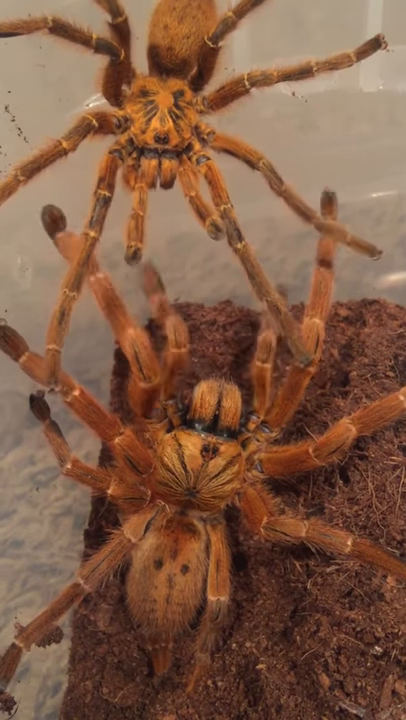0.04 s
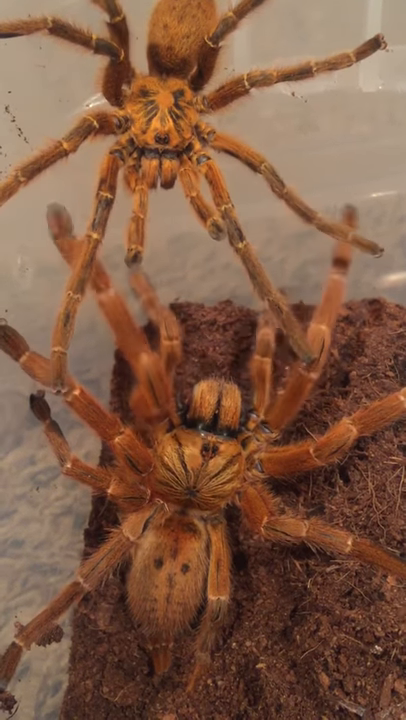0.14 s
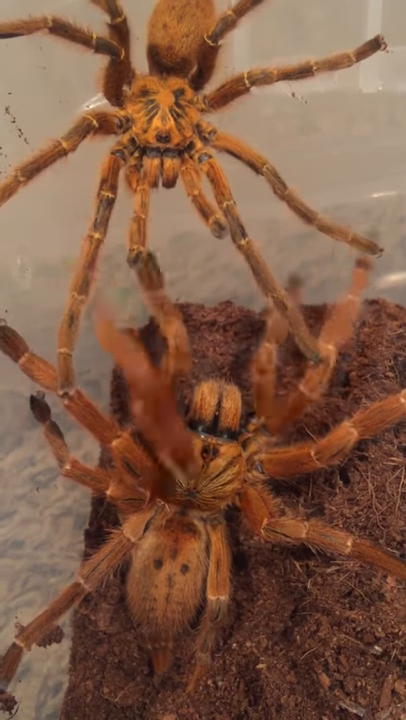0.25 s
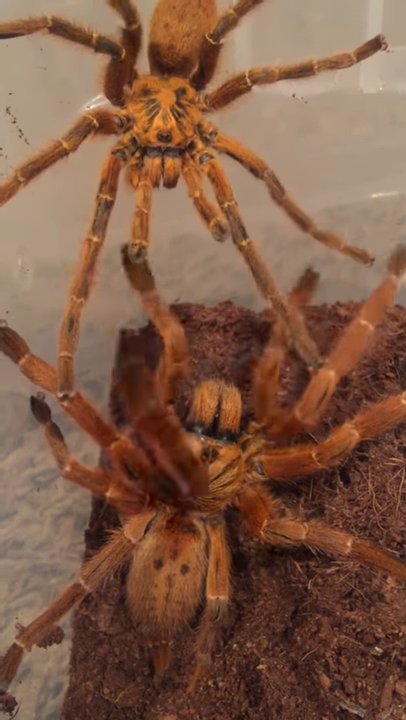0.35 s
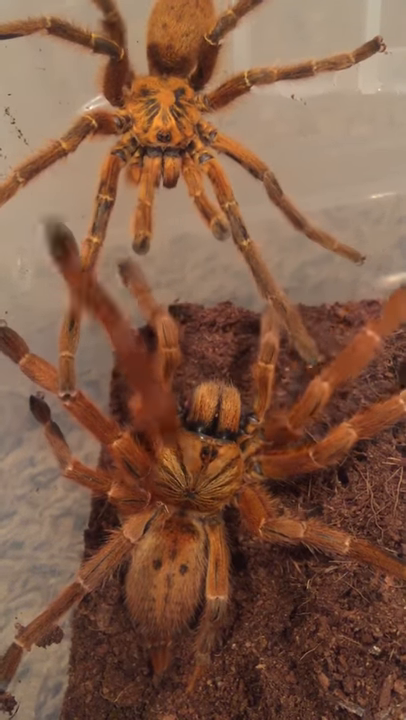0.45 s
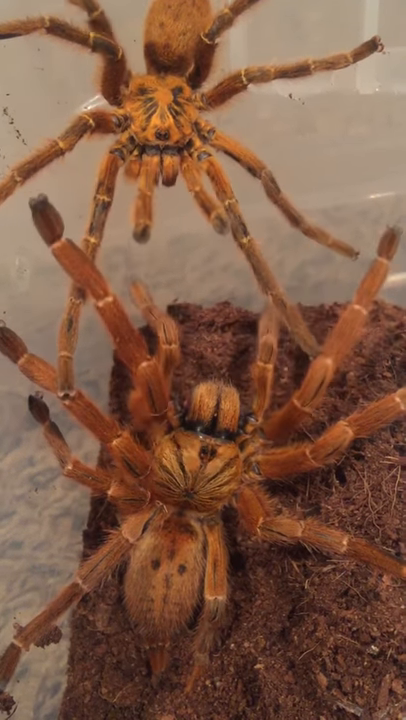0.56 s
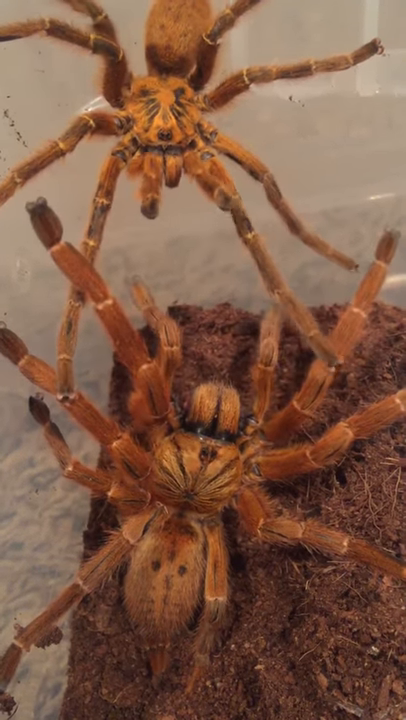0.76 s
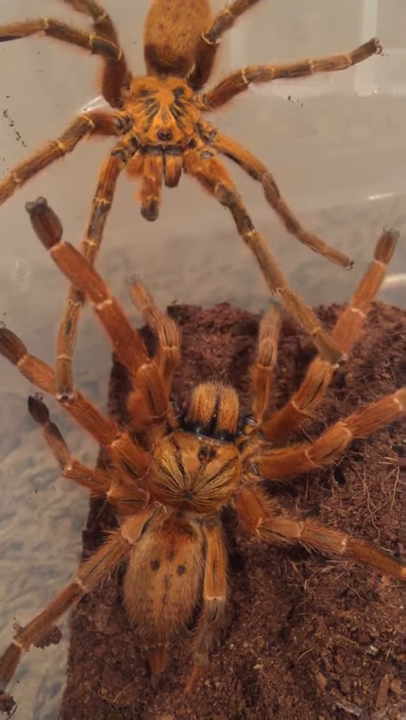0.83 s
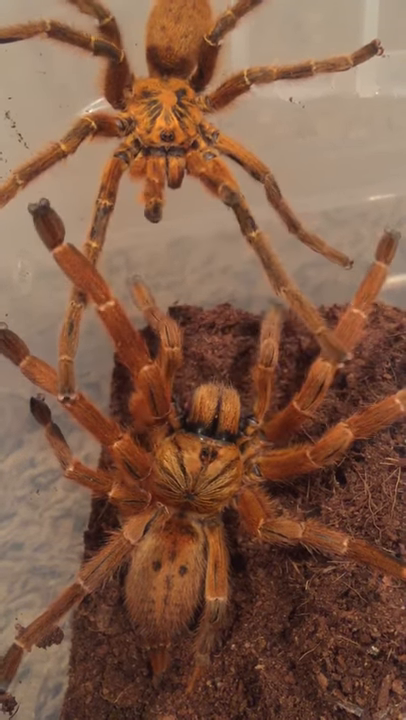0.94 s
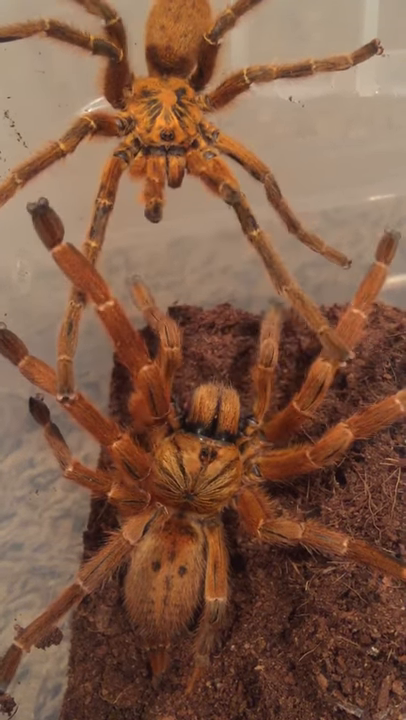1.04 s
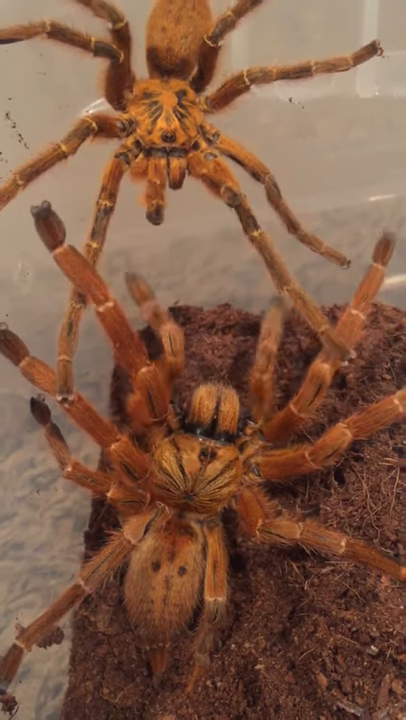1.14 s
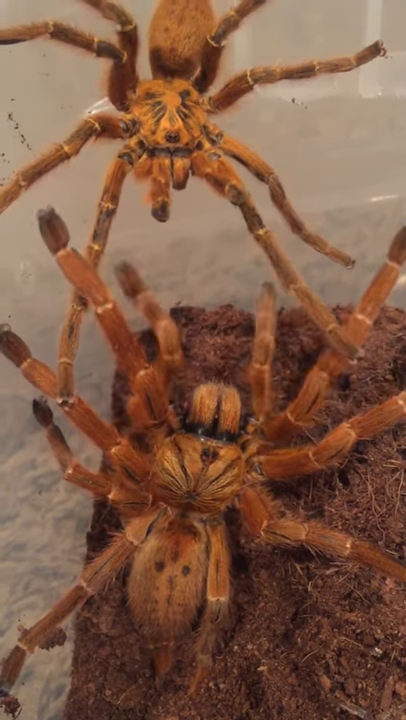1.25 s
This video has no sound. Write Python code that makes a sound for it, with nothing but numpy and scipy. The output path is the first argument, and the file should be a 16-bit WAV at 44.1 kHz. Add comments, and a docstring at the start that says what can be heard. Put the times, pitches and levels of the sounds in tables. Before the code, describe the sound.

One sharp, bright clack sounds on a plastic enclosure and rings briefly in the room. Soft, low handling bumps and faint brushing follow, over the slight rumble and hiss of a quiet room.

```python
"""A quiet room's faint rumble and hiss, then one sharp, bright clack on a plastic enclosure.
Three contacts within ten milliseconds each give a dry crack and set the walls ringing in a dense
cloud of modes; the room carries the ring on. Soft, low handling bumps and faint brushing follow."""
import sys
import numpy as np
from scipy import signal
from scipy.fft import rfft, irfft
from scipy.io import wavfile

SR = 44100
rng = np.random.default_rng(int(sys.argv[2]) if len(sys.argv) > 2 else 0)


def bounce(signal):
    """Save signal as a 16-bit WAV file at the path given by the first command-line argument."""
    frames = np.transpose(np.atleast_2d(signal))
    limited = np.clip(frames, -1, 1)
    pcm = np.round(limited * 32767).astype(np.int16)
    wavfile.write(sys.argv[1], SR, pcm)


N = 57330
T = np.arange(N) / SR
BIN_HZ = np.arange(N // 2 + 1) * SR / N

# the contacts that make up the clack: start_s, relative_db
CONTACTS = [(0.2406, -14.5), (0.2448, -1), (0.2500, 0)]
STRIKE_S = 0.2455   # onset of the strongest modes and the room's tail
UNEVEN_DB = 1.57    # scatter in strength among wall and room modes


def from_db(db):
    """Decibels to gain."""
    return 10 ** (np.asarray(db) / 20)


def at_hz(points, hz):
    """Read a table on a log-frequency axis."""
    table_hz, value = np.transpose(points)
    return np.interp(np.log(np.maximum(hz, 1)), np.log(table_hz), value)


def noise(colour, uneven_db=0, ripple_width_hz=30):
    """Steady noise of a given colour, rms 1, with optional random narrow peaks and dips."""
    bins = len(BIN_HZ)
    ripple = np.interp(BIN_HZ / ripple_width_hz, np.arange(bins), rng.standard_normal(bins))
    magnitude = from_db(at_hz(colour, BIN_HZ) + uneven_db * ripple)
    wave = irfft(magnitude * np.exp(2j * np.pi * rng.random(bins)), N)
    return wave / np.std(wave)


def ring_out(start_s, attack_s, t60_s):
    """A quick swell and an exponential decay."""
    age = np.maximum(T - start_s, 0)
    return (1 - np.exp(-age / attack_s)) * np.exp(-np.log(1000) * age / t60_s)


def background():
    """Low rumble that rises with the handling, over the room's steady drone and hiss."""
    # the rumble's fader ride: time_s, level_db
    rumble_ride = [(0, -68), (.22, -68), (.33, -54.5), (.6, -56), (.7, -61.5), (.9, -72), (1.07, -62.5),
                   (1.2, -70.5), (1.3, -60.5)]
    # spectra of the three beds: frequency_hz, relative_db
    rumble_colour = [(25, -21), (50, 4.5), (75, -2.5), (115, -0.5), (155, -10), (205, -14.5), (300, -27),
                     (450, -34), (900, -62)]
    drone_colour = [(40, -17), (115, 0), (160, -9.5), (210, 0), (290, -9), (430, -16), (900, -50.5)]
    hiss_colour = [(240, -26), (400, -7.5), (560, 0.5), (1320, -3), (1510, -3.5), (1630, -2), (1880, -2),
                   (3850, -6), (15500, -15)]
    rumble = from_db(np.interp(T, *np.transpose(rumble_ride))) * noise(rumble_colour)
    return rumble + from_db(-71) * noise(drone_colour) + from_db(-72.5) * noise(hiss_colour)


def cracks():
    """Each contact gives a short, dry burst: the sharp edge of the clack."""
    # the crack's bright spectrum: frequency_hz, relative_db
    colour = [(500, -5.5), (2000, 0), (3000, 1), (7000, 4.5), (11000, 0.5), (15000, 3.5)]
    bursts = sum(from_db(db) * ring_out(start_s, attack_s=0.0013, t60_s=0.031)
                 for start_s, db in CONTACTS)
    return from_db(-29.5) * noise(colour) * bursts


def wall_cloud(bands=30):
    """Countless overlapping wall modes, fed by each contact; the high ones die first."""
    # spectrum of the dense ring: frequency_hz, relative_db
    colour = [(100, -9), (220, 1), (380, -7.5), (500, -18), (700, -0.5), (950, -9.5), (1450, -15.5),
              (2000, -0.5), (2450, 2.5), (2680, -4), (3150, 2), (4900, -7.5), (5850, 3), (7000, -4.5),
              (8400, -1), (9100, -6), (13500, -5.5), (14500, 0.5), (15500, -4)]
    # build-up, slowest in the lows: frequency_hz, attack_s
    attacks = [(200, 0.016), (700, 0.00256), (2500, 0.0034), (6000, 0.00053), (15000, 0.0013)]
    # ring time: frequency_hz, t60_s
    decays = [(200, 0.42), (700, 0.31), (2500, 0.26), (6000, 0.22), (10000, 0.19), (15000, .16)]
    edges_hz = np.geomspace(70, 17000, bands + 1)
    spectrum = rfft(noise(colour, UNEVEN_DB))
    cloud = 0
    for low, high in zip(edges_hz, edges_hz[1:]):
        band = irfft(spectrum * ((BIN_HZ >= low) & (BIN_HZ < high)), N)
        centre_hz = np.sqrt(low * high)
        attack_s, t60_s = at_hz(attacks, centre_hz), at_hz(decays, centre_hz)
        power = sum((from_db(db) * ring_out(start_s, attack_s, t60_s)) ** 2 for start_s, db in CONTACTS)
        cloud += band * np.sqrt(power)
    return from_db(-27.5) * cloud


def cluster(pitch_hz, count=6, spread_hz=35, neighbour_share=0.32):
    """A main partial beating against weaker close neighbours."""
    neighbour_hz = pitch_hz + spread_hz * rng.standard_normal((count, 1))
    neighbours = np.sin(2 * np.pi * (neighbour_hz * T + rng.random((count, 1)))).sum(axis=0)
    main = np.sin(2 * np.pi * (pitch_hz * T + rng.random()))
    return np.sqrt(1 - neighbour_share) * main + np.sqrt(neighbour_share / count) * neighbours


def wall_modes(attack_s=0.0035):
    """The strongest wall modes ring on as rough pitches."""
    # modes that stand out of the cloud: pitch_hz, relative_db, t60_s
    modes = [(685, -44.5, 0.25), (725, -42.5, .32), (1985, -49, 0.4), (2056, -48, 0.15), (2450, -39, 0.23),
             (2472, -47.5, 0.49), (2495, -42.5, 0.22), (2850, -53, 0.56), (3139, -41.5, .25),
             (3151, -46, 0.56), (3266, -40.5, 0.307), (3490, -42, 0.14), (3872, -44, 0.34),
             (4250, -36.5, 0.12), (4630, -55, 0.63), (5060, -57, 0.25), (5660, -36, 0.23),
             (5800, -41, 0.13), (6260, -58, 0.18), (7965, -45, 0.26), (8425, -37.5, 0.228),
             (8484, -42, 0.29), (8830, -56.5, 0.7), (9740, -55, 0.54), (11640, -59, 0.71),
             (13980, -61, 0.65), (14600, -33, 0.13), (15400, -48, 0.11)]
    return from_db(-0.5) * sum(from_db(db) * ring_out(STRIKE_S, attack_s, t60_s) * cluster(pitch_hz)
                               for pitch_hz, db, t60_s in modes)


def room_tail():
    """The room's diffuse echo blooms behind the clack."""
    # spectrum of the reverb: frequency_hz, relative_db
    colour = [(200, 2), (480, -7), (700, -1), (1300, -10.5), (2300, 7), (4300, -5), (5600, -1),
              (7200, -2.5), (8500, -2), (9500, -14), (15000, -13)]
    return from_db(-47) * noise(colour, UNEVEN_DB) * ring_out(STRIKE_S, attack_s=0.037, t60_s=0.61)


def bumps(rise_s=0.013, sag_per_s=1):
    """Each soft push gives a few low swings that sag slightly in pitch."""
    # handling pushes: start_s, pitch_hz, level_db
    pushes = [(0.267, 80.4, -44.5), (0.291, 84, -50), (.300, 197.5, -46.5), (0.389, 72.5, -45),
              (0.417, 80, -53), (0.447, 113.2, -38.5), (0.467, 83, -35.5), (0.519, 57, -51),
              (.560, 53.5, -52), (0.587, 203, -45.5), (0.595, 92, -47.5), (0.631, 79, -47.5),
              (.625, 214, -53.5), (0.746, 196, -57.5), (0.769, 64.7, -55.5), (1.006, 201, -59.5),
              (1.023, 110, -58), (1.06, 73, -54), (1.138, 72, -58.5), (1.277, 126.5, -50.5)]
    thuds = 0
    for start_s, pitch_hz, level_db in pushes:
        age = np.maximum(T - start_s, 0)
        cycles = pitch_hz * np.cumsum((age > 0) * np.exp(-sag_per_s * age)) / SR
        swell = (age / rise_s * np.exp(1 - age / rise_s)) ** 2
        thuds += from_db(level_db) * swell * np.sin(2 * np.pi * cycles)
    return thuds


def brushes(width_s=0.026):
    """Handling rubs the walls faintly, in strokes that swell and fade."""
    # brush strokes: peak_s, level_db
    strokes = [(.495, -71.5), (0.591, -67.5)]
    # the rub's dull spectrum: frequency_hz, relative_db
    colour = [(250, 5.5), (450, -7.5), (630, -1), (710, 10.5), (790, -4), (1200, -10), (2500, -17.5),
              (6000, -24.5), (15000, -30)]
    swells = sum(from_db(db) * np.exp(-0.5 * ((T - peak_s) / width_s) ** 2) for peak_s, db in strokes)
    return noise(colour) * swells


def scene():
    """The clack, its echo, the handling and the room tone, mixed to mono."""
    clack = cracks() + wall_cloud() + wall_modes()
    return (clack + room_tail() + bumps() + brushes() + background())[None]


def record(dry):
    """A steep low-pass trims the very top."""
    cutoff_hz = 15750
    return signal.sosfilt(signal.ellip(12, 0.1, 60, cutoff_hz, fs=SR, output="sos"), dry)


dry = scene()
out = record(dry)
bounce(out)
```